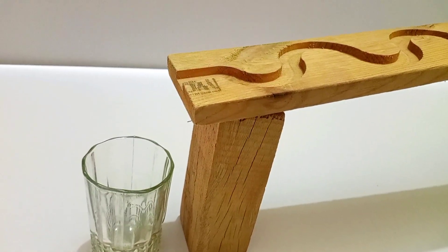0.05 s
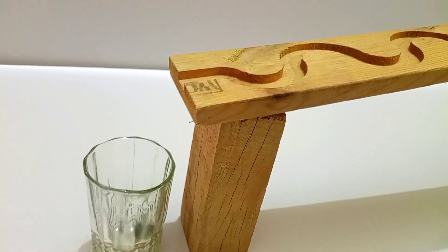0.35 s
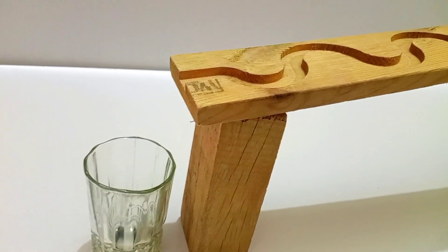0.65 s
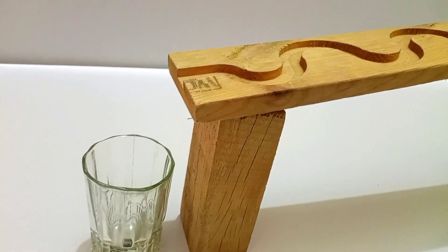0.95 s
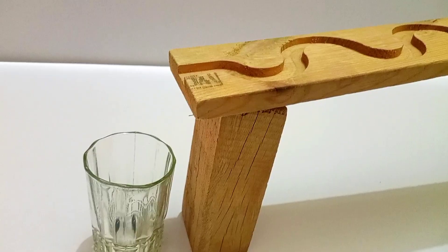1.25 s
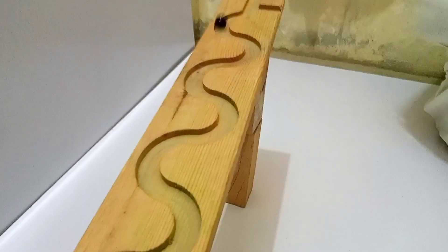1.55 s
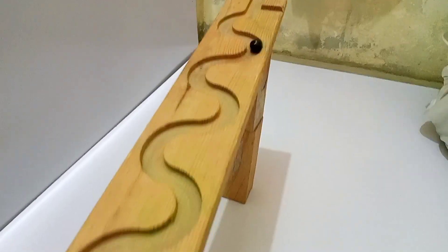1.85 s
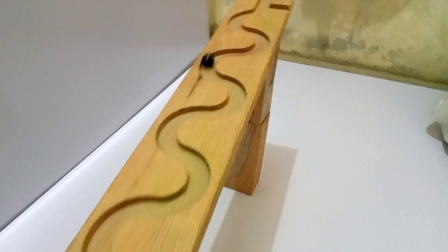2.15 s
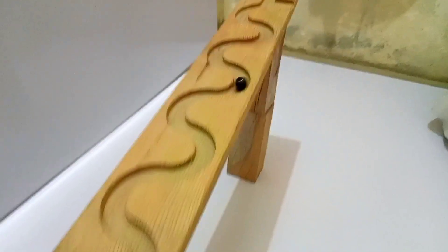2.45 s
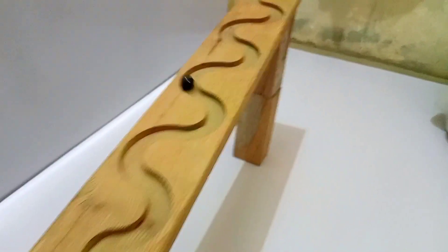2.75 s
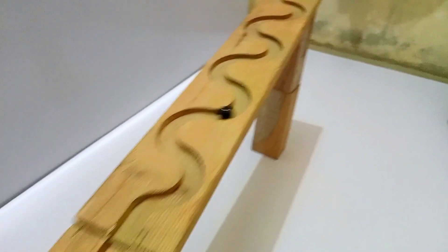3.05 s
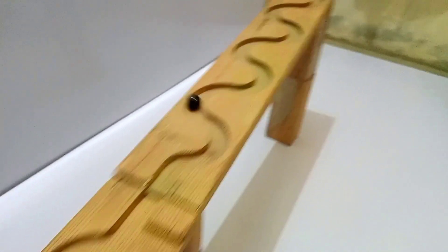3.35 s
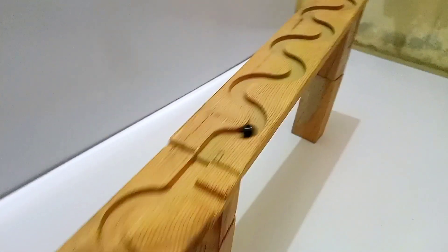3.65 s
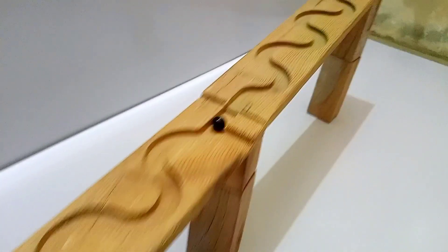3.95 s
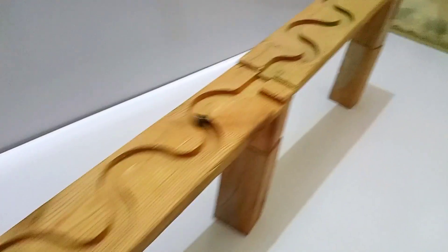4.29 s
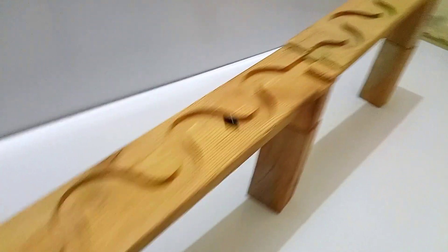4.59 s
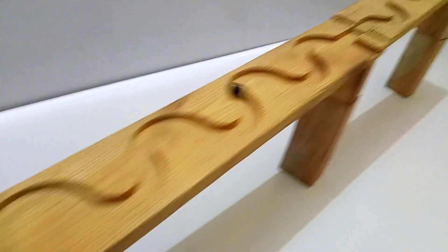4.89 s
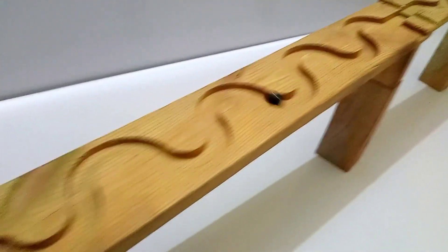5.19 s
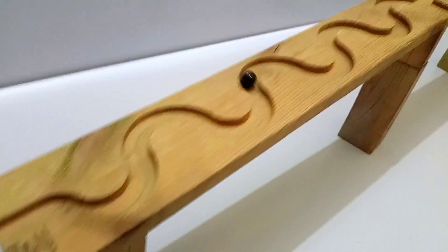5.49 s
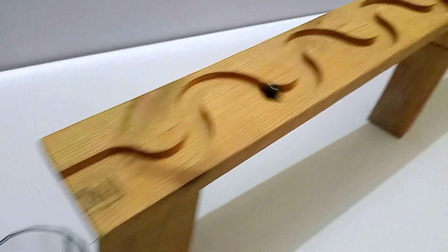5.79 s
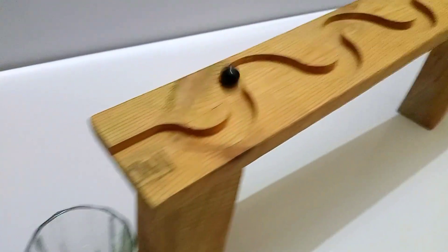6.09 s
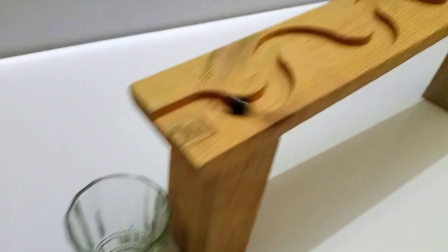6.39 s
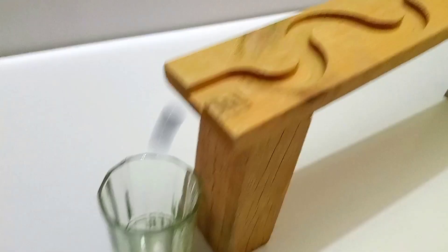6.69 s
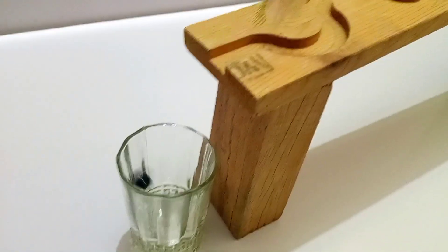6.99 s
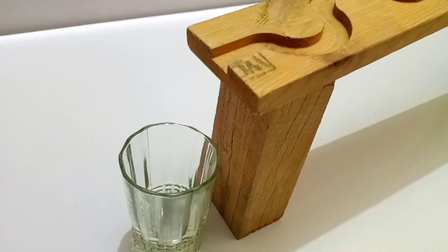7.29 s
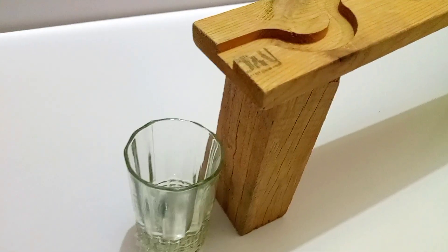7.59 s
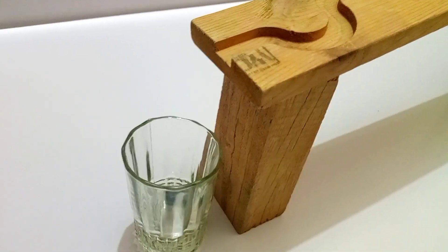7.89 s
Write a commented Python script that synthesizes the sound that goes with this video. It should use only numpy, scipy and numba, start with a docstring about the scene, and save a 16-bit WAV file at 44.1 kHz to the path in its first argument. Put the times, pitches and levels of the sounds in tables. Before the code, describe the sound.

A marble rattles in a drinking glass, then another rolls down a wooden track with soft knocks and drops in, clinking brightly.

```python
"""Two marbles and a drinking glass

A glass marble rattles to rest in a drinking glass on a table. A second one is set on a wavy wooden
track, rolls down two planks with soft knocks, drops into the glass and bounces between its chiming
wall and its thick, clicking base. A small room answers, and a limiter ducks under the loud clinks."""
import sys
import numpy as np
from scipy import signal
from scipy.fft import rfft, irfft
from scipy.io import wavfile
from scipy.ndimage import uniform_filter1d, minimum_filter1d
from numba import njit

SR = 44100
rng = np.random.default_rng(int(sys.argv[2]) if len(sys.argv) > 2 else 0)


def log_audio(samples):
    """Write samples as a 16-bit WAV file to the path given in sys.argv[1]."""
    # one column per channel
    frames = np.atleast_2d(samples).T
    # limit to full scale, then quantise
    limited = np.clip(frames, -1, 1)
    pcm = np.round(limited * 32767).astype(np.int16)
    wavfile.write(sys.argv[1], SR, pcm)


N = 354431
T = np.arange(N) / SR
RING_T = T[:SR]  # one second for a blow to ring out


def undb(db):
    """Decibels to gain."""
    return 10 ** (np.asarray(db) / 20)


def unit(x):
    """Scale to rms 1."""
    return x / np.sqrt(np.mean(x ** 2))


def fader(rows):
    """Gain that glides through (seconds, dB) points and holds at both ends."""
    return undb(np.interp(T, *np.transpose(rows)))


def on_log_axis(points, hz):
    """Read (Hz, value) points on a log-frequency axis."""
    point_hz, value = np.transpose(points)
    return np.interp(np.log(np.maximum(hz, 1)), np.log(point_hz), value)


def add(track, s, sound):
    """Mix a sound into the track at s seconds."""
    i = max(0, int(round(s * SR)))
    track[i:i + len(sound)] += sound[:max(0, N - i)]


def band(x, lo_hz, hi_hz, order=2):
    """Band-pass."""
    sos = signal.butter(order, [lo_hz, min(hi_hz, SR / 2 - 1)], "band", fs=SR, output="sos")
    return signal.sosfilt(sos, x)


def decay(t60):
    """A tail that falls 60 dB in t60 seconds."""
    return np.exp(-np.log(1000) * RING_T / t60)


def onset(rise_s):
    """A softened attack."""
    return 1 - np.exp(-RING_T / rise_s)


def crest(s, length):
    """A bell-shaped swell that peaks at s seconds."""
    return np.exp(-(2 * (T - s) / length) ** 2)


def swells(rows, attack_s, sag_db_per_s, release_db_per_s):
    """Envelope of (start, length, dB) events: each rises, sags while it lasts, then dies away."""
    power = np.zeros(N)
    for s, length, db in rows:
        age = np.maximum(T - s, 0)
        level_db = db - sag_db_per_s * age - release_db_per_s * np.maximum(age - length, 0)
        power += (np.minimum(age / attack_s, 1) * undb(level_db)) ** 2
    return np.sqrt(power)


def ring(modes):
    """Decaying sines of (Hz, dB, t60) modes after one blow."""
    return sum(undb(db) * np.sin(2 * np.pi * hz * RING_T) * decay(t60) for hz, db, t60 in modes)


def through(x, response):
    """Drive a body or a room with a sound."""
    return signal.fftconvolve(x, response)[:N]


def scatter(t60, db, size=2048):
    """A pulse followed by a quickly dying cloud of near reflections."""
    cloud = rng.standard_normal(size) * decay(t60)[:size]
    cloud *= undb(db) / np.linalg.norm(cloud)
    cloud[0] = 1
    return cloud


def grains(per_s, spread_db):
    """Random taps of uneven size."""
    taps = (rng.random(N) < per_s / SR) * rng.standard_normal(N)
    return taps * undb(spread_db * rng.standard_normal(N))


def patchy(x, depth_db, size=512):
    """Let the level waver, differently in each narrow band."""
    frames = signal.stft(x, nperseg=size)[2]
    drift = uniform_filter1d(rng.standard_normal(frames.shape), size=4, axis=0)
    drift = uniform_filter1d(drift, size=14, axis=1)
    return signal.istft(frames * undb(depth_db * unit(drift)), nperseg=size)[1][:N]


# The tone of glass hitting glass. Each row: frequency in Hz, level in dB.
CLICK_SPECTRUM = [(300, -107.5), (1500, -71), (2600, -20), (3000, -7), (3500, 6), (4500, 2), (5200, -0.5),
                  (5800, 3), (7000, -5), (9000, -4.5), (11000, -11.5), (13000, -17.5), (15300, -25),
                  (17000, -56.5)]

def click(size=512):
    """The dry click of hard contact: the shortest causal pulse with this spectrum, peak 1."""
    gain = undb(on_log_axis(CLICK_SPECTRUM, np.fft.rfftfreq(size, 1 / SR)))
    cepstrum = irfft(np.log(gain))
    cepstrum[1:size // 2] *= 2
    cepstrum[size // 2 + 1:] = 0
    pulse = irfft(np.exp(rfft(cepstrum)))
    return pulse / np.abs(pulse).max()


# The marble strikes the wall. Each row: start in seconds, level in dB, height from 0 (low) to 1 (rim),
# sharpness in dB on the top mode family, angle round the glass in radians.
WALL_HITS = [(0, -22.5, 0.59, -24, 0.33), (0.0418, -4.5, 0.51, -2, 0.049), (0.16, -2.5, 0.46, -3, 0.12),
             (0.2965, -18.5, 0.43, 12, 0.25), (.305, -11.5, 0.11, 6, 0.5), (0.3654, -3.5, 0.17, 2, 0.092),
             (0.4412, -33.5, 0.043, 30.5, 0.16), (.449, -25, 0, 7, 2.7), (0.475, -27, 0.038, -11, 2),
             (0.5131, -25, 0.28, -6, 1.04), (.521, -16.5, 0.16, 8, 0.47), (0.5582, -23, 0.24, -23, 0.28),
             (0.607, -17.5, 0, 7, 1.2), (0.642, -39, 0.23, -6.5, 3.69), (0.7354, -31.5, 0, -4, 0.17),
             (6.809, -20, 0.55, 8, 0.52), (6.8768, -9, 0.9, 0, 0.56), (6.9958, -5.5, 0.85, -7, 0.36),
             (7.1775, -12.5, 0.96, 4, 0.94), (7.485, -16.5, 0.37, 3, 1.7), (7.652, -15.5, 0.34, 2, 1.7),
             (7.9646, -29, 0.28, -9, 1.6)]
# The wall's mode families, lowest first. Each row: level in dB struck low, level in dB struck at the rim.
FAMILY_DB = [(-18.5, -9.5), (-16, 5.5), (6, -15), (-11, -8.5), (-13.5, -14.5)]
# The wall's paired modes. Each row: family number, pitch in Hz, pitch of its twin in Hz.
GLASS_PAIRS = [(0, 2357, 2392.6), (1, 5787, 5712), (2, 7623, 7651), (2, 7579, 7640), (3, 9803, 9857),
               (3, 9837, 9760), (3, 10181, 10215), (4, 14290, 14175), (4, 14982, 15083), (4, 15153, 15185),
               (4, 15351, 15422)]
# How those pairs ring. Each row: level in dB, t60 in seconds.
PAIR_RING = [(2, 0.54), (2, 0.18), (1.5, 0.18), (-10, 0.057), (2.5, 0.11), (-7.5, 0.2), (-7.5, 0.16),
             (-15, 0.095), (-6.5, 0.1), (2, 0.099), (5.5, 0.075)]
# Short pings of the base and the air in the cup. Each row: pitch in Hz, level in dB, t60 in seconds.
CUP_MODES = [(3544, -27, 0.14), (3440, -24.5, 0.03), (2980, -33.5, 0.14), (4190, -21.5, 0.052),
             (4230, -33.5, .1), (5250, -27, 0.15), (6600, -28, 0.1), (6904, -33, .12), (8500, -38, .1)]

def glass_wall(contact_db=-7, cup_db=-11, glance_db=-7, low_pair_turn_rad=0.12):
    """Chime and contact ticks. The glass is not quite round, so its modes ring in pairs that beat."""
    chime, ticks = np.zeros(N), np.zeros(N)
    tick = band(np.convolve(click(), scatter(t60=0.0056, db=8)), 4900, 17000, order=3)
    cup = band(ring(CUP_MODES), 3000, 9000)
    low_db, rim_db = np.transpose(FAMILY_DB)
    for s, hit_db, height, sharp_db, strike_rad in WALL_HITS:
        family_db = hit_db + low_db + height * (rim_db - low_db)
        family_db[-1] += sharp_db
        modes = []
        for (family, hz, twin_hz), (db, t60) in zip(GLASS_PAIRS, PAIR_RING):
            # the angle shares the blow between the twins
            angle = strike_rad + (low_pair_turn_rad if family == 0 else 0)
            for mode_hz, share in ((hz, np.cos(angle)), (twin_hz, np.sin(angle))):
                share_db = 10 * np.log10(share ** 2 + 1e-4)
                modes.append((mode_hz, family_db[family] + db + share_db, t60))
        add(chime, s, ring(modes) * onset(0.001))
        add(chime, s, cup * undb(max(family_db) + cup_db))
        # low on the wall the marble only glances off, with less of a click
        add(ticks, s, tick * undb(max(family_db) + contact_db + glance_db * (0.5 - height)))
    # a small glass radiates almost nothing below its lowest mode
    return band(chime, 1500, 18000, order=3), ticks


def flutter(x, rate_hz=120, split_hz=6800, waver_db=1.7, sway_db=0.5):
    """A random level flutter laid over the chime, slight below the split and rougher above it."""
    upper = signal.sosfiltfilt(signal.butter(4, split_hz, "high", fs=SR, output="sos"), x)
    waver = unit(band(rng.standard_normal(N), rate_hz / 6, rate_hz))
    sway = unit(band(rng.standard_normal(N), rate_hz / 12, rate_hz / 2))
    return (x - upper) * undb(sway_db * sway) + upper * undb(waver_db * waver)


# The colour of the room's air. Each row: frequency in Hz, relative noise density in dB.
AIR_SPECTRUM = [(18, -43.5), (30, -17.5), (70, -25), (98, 0), (131, -11.5), (319, -6.5), (355, -2.5),
                (540, -7), (1350, -9), (2830, -14.5), (4530, -19.5), (5300, -22.5), (6050, -19.5),
                (6600, -22.5), (7870, -28), (16000, -53.5)]
# The fader on its hiss. Each row: time in seconds, treble gain in dB.
HISS_FADER = [(0, 13), (1.3, 5), (2.2, 2), (4.4, 1), (5.2, -4), (6.7, -4.5), (8, -41)]

def room_tone(air_db=-59, split_hz=3500):
    """A bed of steady air noise whose hiss fades over the scene."""
    hz = np.fft.rfftfreq(N, 1 / SR)
    colour = undb(on_log_axis(AIR_SPECTRUM, hz))
    air = unit(irfft(rfft(rng.standard_normal(N)) * colour, N))
    treble = irfft(rfft(air) * hz ** 2 / (hz ** 2 + split_hz ** 2), N)
    return undb(air_db) * (air + treble * (fader(HISS_FADER) - 1))


# Slaps off the table, a post and the room's wall. Each row: delay in seconds, level in dB.
REFLECTIONS = [(.0047, -12), (0.0117, -10), (0.0187, -26), (0.0297, -29.5), (.047, -32.5)]

def reflect(x):
    """Near surfaces return the ring a little later, which makes it fade unevenly."""
    out = x.copy()
    for s, db in REFLECTIONS:
        add(out, s, undb(db) * x)
    return out


# The room's decay. Each row: frequency in Hz, t60 in seconds.
ROOM_T60 = [(100, 0.52), (800, 0.38), (2500, 0.26), (6000, 0.26), (10000, 0.16), (16000, .17)]

def room_tail(build_s=0.0035):
    """Diffuse tail of a small room, shorter in the treble; unit energy."""
    edges_hz = np.geomspace(50, 18000, 9)
    tail = np.zeros(SR)
    for lo, hi in zip(edges_hz, edges_hz[1:]):
        t60 = on_log_axis(ROOM_T60, np.sqrt(lo * hi))
        tail += band(rng.standard_normal(SR), lo, hi, order=3) * decay(t60)
    tail *= 1 - np.exp(-(RING_T / build_s) ** 2)
    return tail / np.linalg.norm(tail)


# The first marble skids; the first row is the brief clatter as its landing on the base at 0.096 s dies away.
# Each row: start in seconds, length in seconds, level in dB.
SKIDS = [(.093, 0.048, -36), (.297, 0.046, -38), (.438, 0.11, -45.5), (.675, 0.038, -47)]

def skid(cup_db=-11.5):
    """Many tiny contacts blur into a soft clatter while the marble circles the glass."""
    contact = np.convolve(click(), scatter(t60=0.02, db=14.5))
    clatter = band(through(grains(per_s=1500, spread_db=5.5), contact), 5400, 12050)
    cup = unit(through(clatter, ring(CUP_MODES)))
    envelope = swells(SKIDS, attack_s=0.002736, sag_db_per_s=42, release_db_per_s=401.5)
    return unit(unit(clatter) + undb(cup_db) * cup) * envelope


# The marble lands on the base. Each row: start in seconds, click level in dB, rocking level in dB.
BASE_HITS = [(.096, -29, -41.5), (.314, -44, -41), (.442, -33, -67), (.56, -45, -59), (.64, -56, -59.5),
             (6.8197, -6, -54.5), (7.0962, -11, -55.5), (7.333, -9.5, -61.5), (7.5414, -16, -66.5),
             (7.715, -17.5, -60), (7.8592, -17.5, -69), (7.9814, -15, -82.5), (8.029, -28.5, -83)]
# Wall modes that a blow on the base also reaches. Each entry: pitch in Hz.
BASE_HZ = [2392, 5712, 7650, 9857, 14172, 15153, 15290, 15421]
# How those modes ring. Each row: level in dB, t60 in seconds.
BASE_RING = [(-43.5, .3), (-27, 0.2), (-22.5, 0.14), (-38, 0.08), (-26, .085), (-22, .085), (-24.5, .08),
             (-22, .09)]
# The glass rocking on the table. Each row: pitch in Hz, level in dB, t60 in seconds.
ROCK_MODES = [(758, 0.5, 0.25), (802, 11.5, 0.11), (854, -11.5, .07)]

def glass_base():
    """The thick base hardly rings: a sharp click rattles inside the cup, and the glass rocks."""
    out, tick = np.zeros(N), click()
    wall = ring([(hz, db, t60) for hz, (db, t60) in zip(BASE_HZ, BASE_RING)])
    faint_ring = band(wall + ring(CUP_MODES), 2600, 18000)
    rock = band(ring(ROCK_MODES), 730, 1000)
    for s, db, rock_db in BASE_HITS:
        rattle = band(np.convolve(tick, scatter(t60=0.016, db=-1)), 2200, 13000)
        for layer in (tick, rattle, faint_ring):
            add(out, s, undb(db) * layer)
        add(out, s, undb(rock_db) * rock)
    return out


# Glassy chatter. Each row: start in seconds, relative level in dB, pitch in Hz.
CHATTER = [(.096, -28, 5190), (.129, -39, 3950), (.312, -32.5, 5090), (.434, -42, 3550), (0.442, -33, 3580),
           (.45, -36, 4200), (.491, -43, 3700), (.52, -34, 4250), (0.5552, -39, 5060), (0.591, -35.5, 4270),
           (.637, -44.5, 5090), (.699, -43, 5270), (6.8775, -10, 3590), (6.996, -15, 3550),
           (7.1754, -20, 3560), (7.487, -25.5, 3550), (7.652, -23, 3630)]

def chatter(trim_db=-4, ping_t60=0.044, cup_db=6):
    """Soft-edged pings where the marble's touch reaches the thick foot of the wall."""
    out = np.zeros(N)
    for s, db, hz in CHATTER:
        ping = ring([(hz, 0, ping_t60)]) + undb(cup_db) * ring(CUP_MODES)
        add(out, s, undb(db + trim_db) * ping * onset(0.00092))
    return band(out, 2800, 9000)


def ring_fade(start_s=0.8, fade_db_per_s=230):
    """The ring and its room tail fade quickly after 0.8 s; the gain reopens at the first knock."""
    before_knocks = T < KNOCKS[0][0]
    return undb(-fade_db_per_s * np.clip(T - start_s, 0, 1) * before_knocks)


# Dull bumps. Each row: start in seconds, level in dB.
BUMPS = [(1.374, -51), (6.49, -45), (6.998, -32)]
# The table's thud. Each row: pitch in Hz, level in dB, t60 in seconds.
BUMP_MODES = [(63, -2, 0.06), (99, -9, 0.093)]

def table_bumps():
    """The table thuds softly under the blows that reach it."""
    out = np.zeros(N)
    for s, db in BUMPS:
        add(out, s, undb(db) * ring(BUMP_MODES))
    return band(out, 57, 200)


# Ticks along the track. Each row: start in seconds, level in dB.
TRACK_TICKS = [(1.436, -47.5), (2.087, -40.5), (2.336, -42), (3.675, -55), (4.172, -46.5), (4.926, -41)]

def track_ticks():
    """Fine, bright ticks of the marble on the wood."""
    out = np.zeros(N)
    for s, db in TRACK_TICKS:
        add(out, s, undb(db) * band(scatter(t60=0.033, db=14), 2400, 9200, order=4))
    return out


JOINT_S = 3.7  # the marble crosses from the upper plank to the lower
# The voices of the two planks. Each row: pitch in Hz, level in dB, t60 in seconds.
UPPER_PLANK = [(1324, 3.5, 0.097), (1400, -9.5, 0.1), (1674, -3, 0.095), (1880, 1.5, 0.084),
               (2160, -11.5, 0.065), (2550, 2, 0.12), (2860, -13.5, 0.055), (3155, -8, 0.38),
               (3320, 3.5, 0.044), (4020, 8.5, 0.012), (4764, -3.5, 0.015), (5358, -11, .02),
               (6760, -11, 0.026)]
LOWER_PLANK = [(870, -8, 0.094), (1434, -2, 0.12), (1535, 1, 0.1), (1722, -8, 0.07), (1864, 0, 0.17),
               (2040, 3, 0.043), (2072, 5, 0.088), (2267, 0, 0.14), (2452, -1.5, 0.09), (2735, -3.5, 0.38),
               (2890, 2.5, 0.05), (3150, 0, 0.08), (3620, -6, 0.064), (3888, -3, 0.034), (4060, -11, 0.03),
               (6500, -2.5, 0.035), (6870, -2.5, 0.027)]
# Knocks in the groove. Each row: start in seconds, plank level in dB, ping pitch in Hz,
# ping level in dB, ping t60 in seconds.
KNOCKS = [(1.437, -29.5, 4140, -24, 0.016), (1.4728, -25, 2920, -26.5, 0.013),
          (1.499, -35, 1550, -41, 0.026), (1.515, -52, 2485, -32, 0.026), (1.575, -27, 3960, -23.5, 0.029),
          (1.6, -26, 3960, -24, 0.044), (1.926, -55, 3090, -49, 0.047), (1.98, -48, 1850, -41.5, 0.045),
          (2.033, -43, 3990, -48, .04), (2.082, -51, 2530, -52, 0.038), (2.164, -51, 3410, -49.5, 0.035),
          (2.8136, -44, 3700, -45, 0.027), (2.941, -48.5, 3990, -51, .03), (3.134, -44, 2554, -40, 0.059),
          (3.1763, -54.5, 1480, -48, 0.15), (3.403, -52.5, 3100, -51, 0.037),
          (3.756, -50.5, 1460, -44.5, 0.05), (3.8841, -14.5, 2140, -32, 0.026),
          (3.897, -36, 1405, -32, 0.067), (3.908, -37.5, 2780, -24.5, .06),
          (3.916, -22.5, 2130, -24.5, 0.055), (3.929, -43, 3530, -43, 0.062),
          (4.068, -55, 3503, -33, 0.041), (4.072, -39, 1441, -31.5, 0.09), (4.312, -44, 3520, -39, 0.035),
          (4.549, -41, 2180, -43.5, 0.034), (4.581, -47, 1890, -45, 0.087), (4.869, -55, 2050, -50, .04),
          (5.195, -51, 1894, -49.5, 0.044), (5.3098, -46.5, 1844, -45, 0.1), (5.326, -53, 2490, -52, 0.11),
          (5.526, -55, 1910, -51, 0.063), (5.666, -45, 3480, -50, 0.04), (5.7315, -47.5, 2860, -45, 0.05),
          (5.896, -51.5, 1990, -51, 0.039), (5.915, -56, 4320, -51, 0.033),
          (6.179, -40.5, 2890, -45, 0.043), (6.3241, -41.5, 2793, -36.5, 0.054),
          (6.3582, -41, 2860, -28.5, 0.041), (6.489, -40.5, 1908, -33, 0.042)]

def knocks(body_db=-5, crack_db=-15, hollow_db=-19, rough_db=-13, hard_knock_db=-14):
    """The marble hits the bends: the plank cracks and rings, and the spot gives a rough, hollow ping."""
    wood, pings = np.zeros(N), np.zeros(N)
    for s, db, ping_hz, ping_db, ping_t60 in KNOCKS:
        plank = UPPER_PLANK if s < JOINT_S else LOWER_PLANK
        # a gentler blow stays in contact longer, so it starts more softly and sounds duller
        hardness = undb(0.12 * (db - hard_knock_db))
        contact = onset(0.00075 / hardness)
        # neighbouring modes move in opposite directions at the point of contact
        body = sum((-1) ** k * ring([mode]) for k, mode in enumerate(plank))
        body /= np.linalg.norm(undb(np.array(plank)[:, 1]))
        # the plank's many short-lived modes blur into a crack
        crack = unit(band(rng.standard_normal(SR), 1530, 3820, order=4)) * decay(0.11)
        knock = contact * undb(db) * (undb(body_db) * body + undb(crack_db) * crack)
        add(wood, s, band(knock, 820, 7500 * hardness, order=3))
        rough = unit(band(rng.standard_normal(SR), ping_hz / 1.22, ping_hz * 1.22, order=3))
        ping = ring([(ping_hz, 0, ping_t60), (ping_hz, hollow_db, 0.12)])
        ping += undb(rough_db) * rough * decay(0.075)
        add(pings, s, contact * undb(ping_db) * ping)
    return wood, band(pings, 640, 7000, order=3)


# Brushes along the groove. Each row: peak time in seconds, level in dB, length in seconds,
# band centre in Hz, hiss against the plank's grit in dB.
BRUSHES = [(1.441, -42, 0.017, 3740, -1), (1.526, -39.5, 0.074, 1860, -8.5), (2.058, -59.5, 0.2, 2520, 5),
           (2.854, -56, 0.055, 2747, -3), (3.179, -50.5, 0.1, 2107, -2), (4.19, -56, 0.036, 4000, 2),
           (4.387, -56, 0.033, 2180, -6), (4.522, -53, 0.028, 3710, 12), (4.574, -56.5, 0.12, 2780, 0),
           (4.768, -64, 0.039, 4060, 6), (4.955, -54.5, 0.065, 3900, -1.5), (5.329, -57.5, 0.04, 2184, -11),
           (6.009, -65.5, 0.035, 4240, 0), (6.197, -56, 0.13, 2986, -6)]

def brushes(grit, spread=1.59):
    """The marble rubs the groove's side: friction hisses at the contact and rasps through the plank."""
    out = np.zeros(N)
    hiss = unit(grains(per_s=4300, spread_db=3))
    for s, db, length, hz, hiss_db in BRUSHES:
        friction = band(grit + undb(hiss_db) * hiss, hz / spread, hz * spread, order=5)
        out += undb(db) * crest(s, length) * unit(friction)
    return out


def pressed_planks(taps, damping_t60=0.12):
    """Taps sound through the plank under the marble, whose pressure shortens the ring."""
    upper = unit(through(taps, decay(damping_t60) * ring(UPPER_PLANK)))
    lower = unit(through(taps, decay(damping_t60) * ring(LOWER_PLANK)))
    return np.where(T < JOINT_S, upper, lower)


# The fader on the roll. Each row: time in seconds, level in dB.
ROLL_FADER = [(1.6, -74.5), (1.8, -62.5), (2.1, -58.5), (2.5, -62.5), (4.3, -66), (4.6, -55.5),
              (4.9, -63.5), (6.6, -65.5), (6.85, -74)]

def rolling(hops_per_s=14, hop_db=-4, grain_db=-5, wood_db=-6):
    """Wood grain taps the marble over a low drone. Returns the roll, and its grit for the brushes."""
    grain = band(grains(per_s=880, spread_db=3), 998, 3900)
    # each spot along the groove favours other resonances
    grit = unit(patchy(pressed_planks(grain), depth_db=4))
    drone = unit(band(rng.standard_normal(N), 290, 461))
    # now and then the marble hops over a ridge of the grain
    ridges = (rng.random(N) < hops_per_s / SR) * rng.uniform(0.3, 1, N)
    hops = band(through(ridges, scatter(t60=0.02, db=5)), 1400, 4800, order=4)
    wood = unit(grit + undb(grain_db) * unit(grain) + undb(hop_db) * pressed_planks(hops))
    return fader(ROLL_FADER) * (drone + undb(wood_db) * wood), grit


# The table's low resonances. Each row: pitch in Hz, level in dB, t60 in seconds.
RUMBLE_MODES = [(64.4, -6.5, 1), (110.3, -0.5, 1), (144.7, 8, 0.15), (190.5, -10.5, 0.27), (228, -6, 0.13),
                (316.5, -6, 0.083)]
# Its shudders. Each row: start in seconds, length in seconds, level in dB.
SHUDDERS = [(3.505, 0.25, -40), (3.93, 0.027, -36.5), (4.03, 0.016, -41), (4.16, 0.032, -45),
            (4.495, 0.53, -34), (4.92, 0.039, -36.5), (5.05, 0.48, -54)]
# Short low hums. Each row: peak time in seconds, pitch in Hz, level in dB, length in seconds.
HUMS = [(3.844, 390, -52.5, 0.024), (4.035, 388, -45, 0.015), (4.227, 372.5, -54.5, 0.079),
        (4.29, 400, -47, 0.043), (4.693, 415, -53, 0.062), (6.687, 348, -50.5, 0.031),
        (7.759, 342, -47.5, 0.035)]

def table_rumble(steady_s=0.14):
    """The table shudders as the marble crosses the middle of the track; a few hums sit above it."""
    rumble = band(through(rng.standard_normal(N), ring(RUMBLE_MODES)), 58, 414, order=3)
    rumble /= np.sqrt(uniform_filter1d(rumble ** 2, int(steady_s * SR)) + 1e-12)  # even out the level
    out = rumble * swells(SHUDDERS, attack_s=0.066, sag_db_per_s=25, release_db_per_s=223)
    for s, hz, db, length in HUMS:
        out += undb(db) * crest(s, length) * np.sin(2 * np.pi * hz * T)
    return out


def scene(wall_send_db=-8, click_send_db=-12, wood_send_db=-5, ping_send_db=-12):
    """Glass, track and table in one room whose surfaces swallow the top of the clicks."""
    chime, wall_ticks = glass_wall()
    wood, pings = knocks()
    wall = flutter(reflect(chime)) * ring_fade()
    clicks = wall_ticks + glass_base() + skid() + chatter()
    send = undb(wall_send_db) * wall + undb(click_send_db) * band(clicks, 4300, 12000, order=1)
    send += undb(wood_send_db) * wood + undb(ping_send_db) * pings
    reverb = through(send, room_tail()) * ring_fade()
    table = table_rumble() + table_bumps()
    roll, grit = rolling()
    track = wood + pings + roll + brushes(grit) + track_ticks()
    air = patchy(room_tone(), depth_db=1.7)
    return (wall + clicks + track + table + reverb + air)[None]


@njit
def follow_peaks(x, release):
    """Peak follower: rises at once, sinks slowly."""
    out, peak = np.empty(len(x)), 0.
    for i in range(len(x)):
        peak = max(x[i], peak * (1 - release))
        out[i] = peak
    return out


def record(dry, ceiling_db=-11, release_s=0.047, attack_s=0.0011, top_hz=16300):
    """A look-ahead limiter holds the clinks down and lets the room swell back; then the top is cut."""
    peaks = follow_peaks(np.abs(dry[0]), 1 / (release_s * SR))
    gain = np.minimum(1, undb(ceiling_db) / (peaks + 1e-9))
    span = int(attack_s * SR)
    gain = uniform_filter1d(minimum_filter1d(gain, span), span)
    return signal.sosfilt(signal.ellip(8, 0.2, 70, top_hz, fs=SR, output="sos"), dry * gain)


dry = scene()
out = record(dry)
log_audio(out)
```